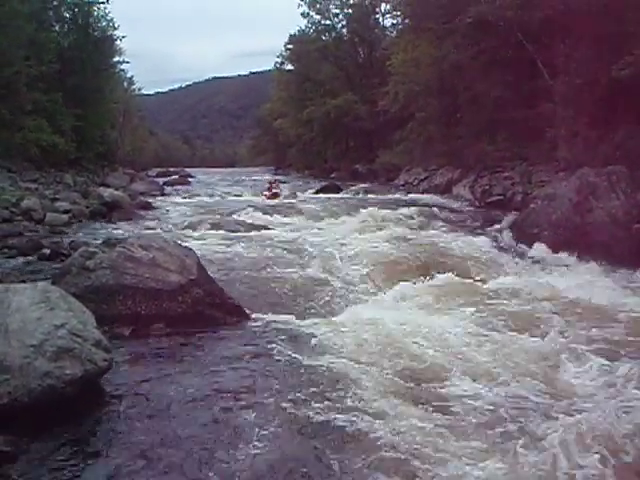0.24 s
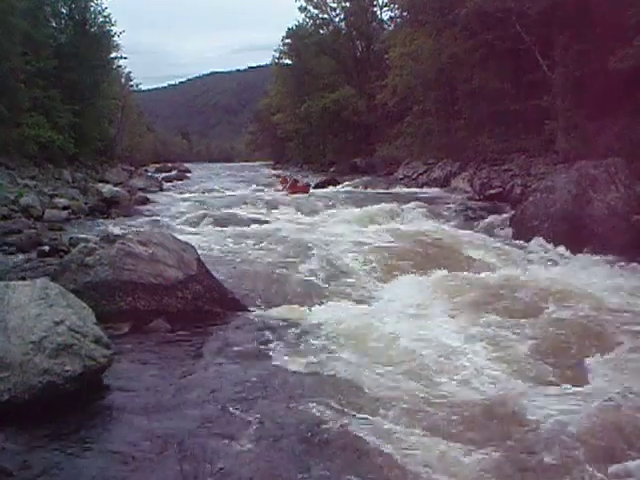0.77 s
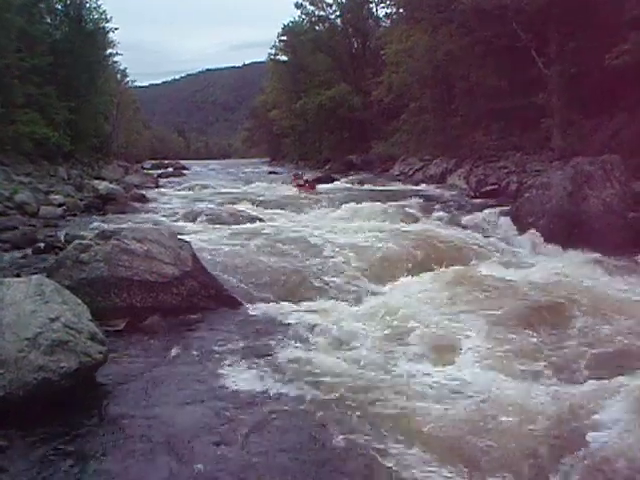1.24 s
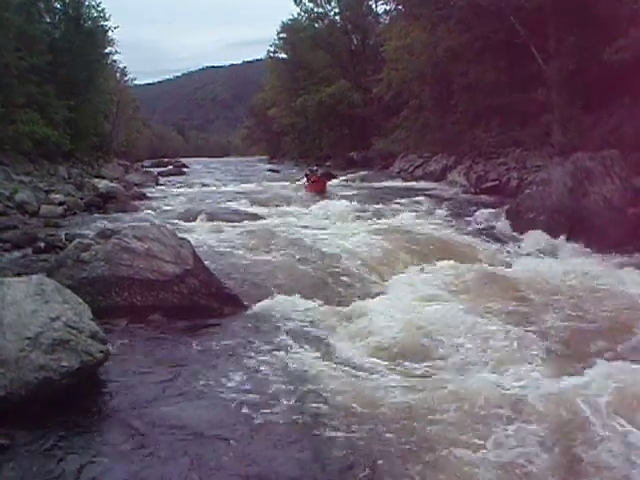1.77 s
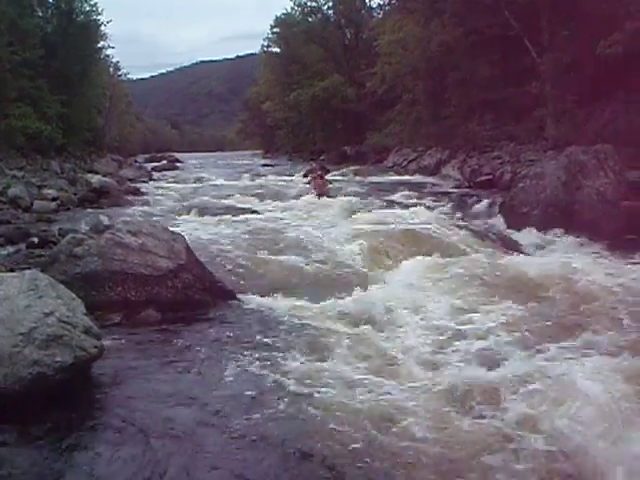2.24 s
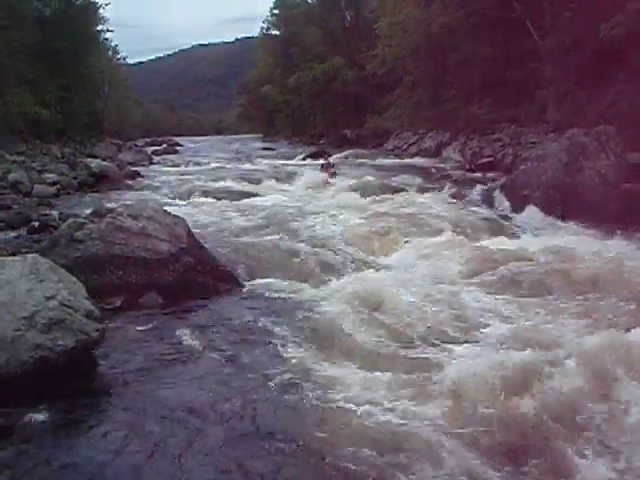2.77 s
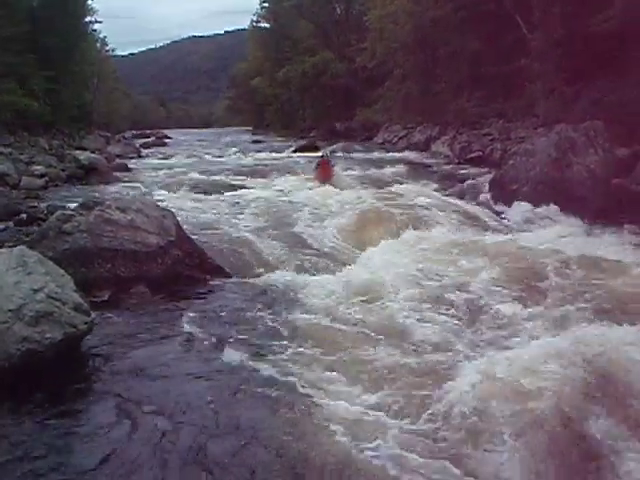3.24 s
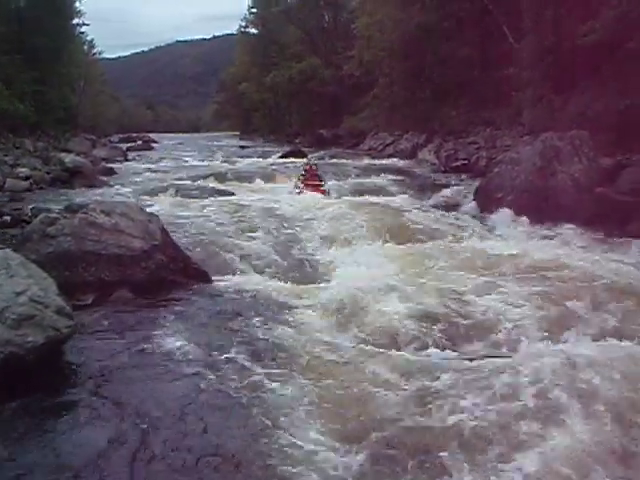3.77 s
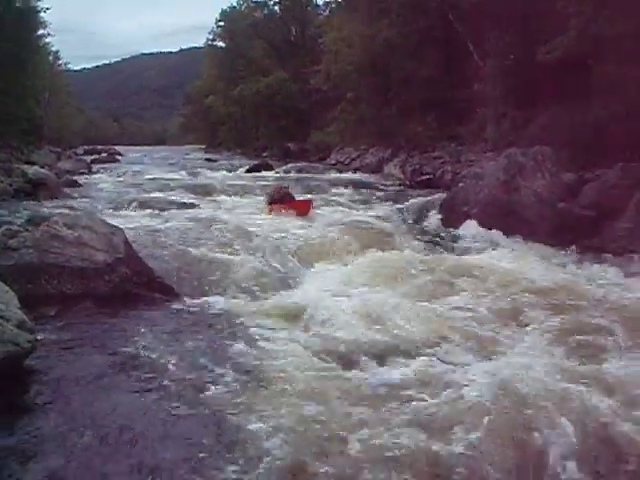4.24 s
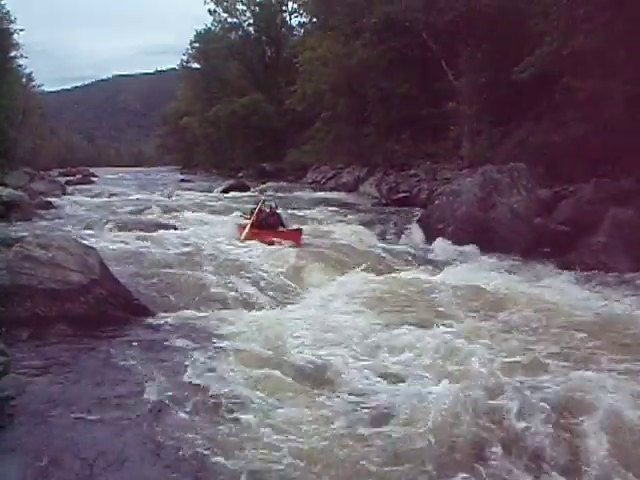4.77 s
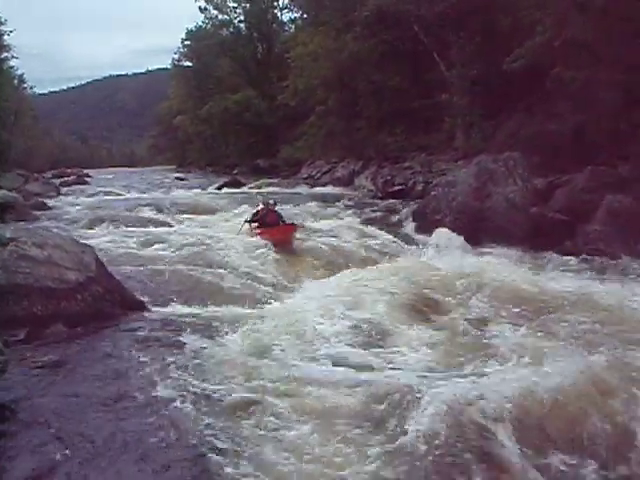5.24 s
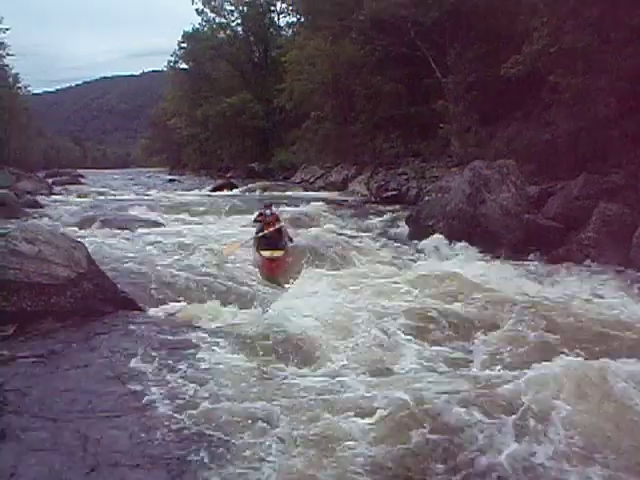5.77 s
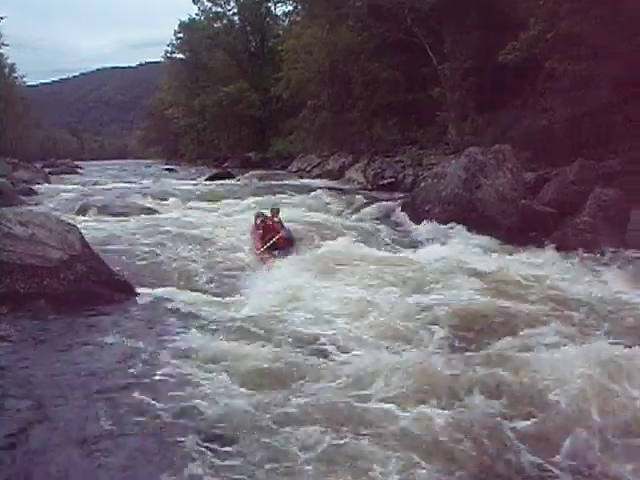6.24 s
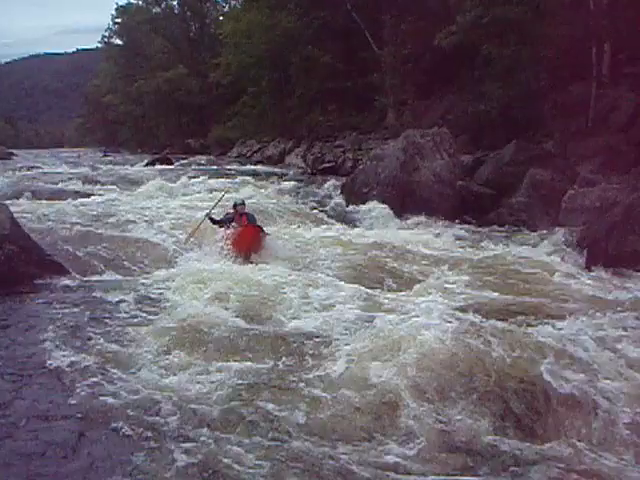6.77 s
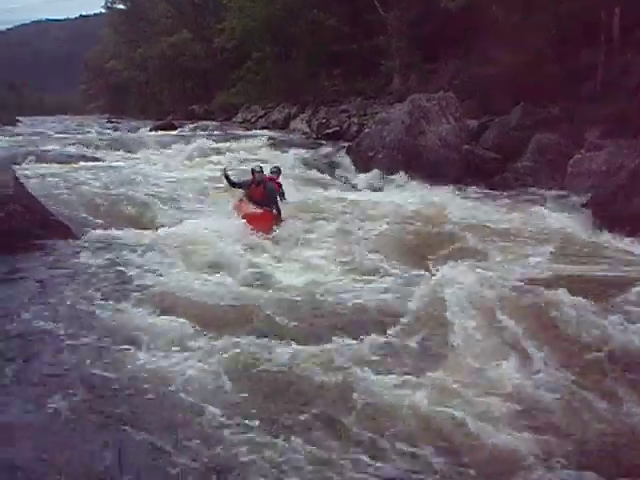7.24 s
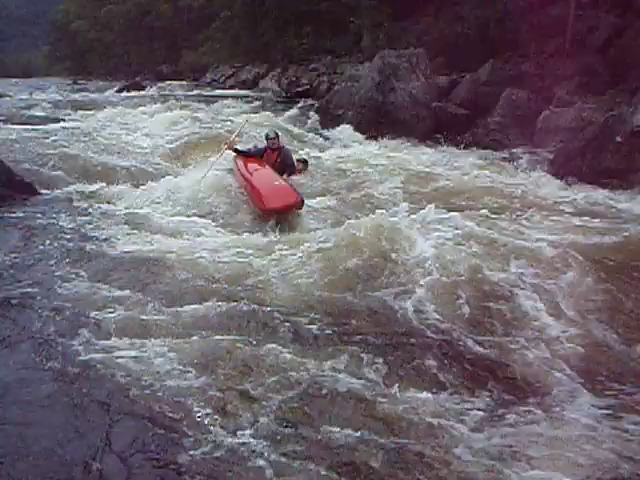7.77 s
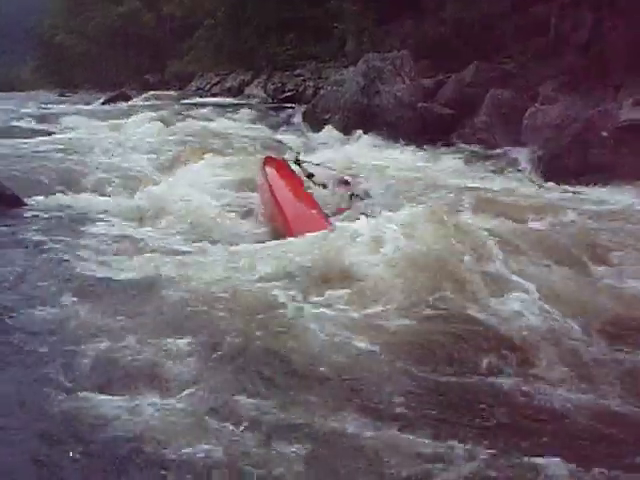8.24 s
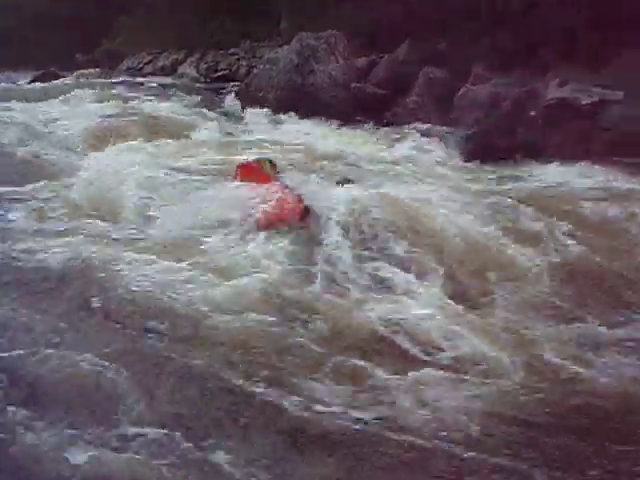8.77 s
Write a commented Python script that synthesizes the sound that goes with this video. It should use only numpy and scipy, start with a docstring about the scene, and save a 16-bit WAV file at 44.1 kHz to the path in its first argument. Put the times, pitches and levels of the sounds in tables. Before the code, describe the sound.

Continuous river rapids outdoors, close to the bank, mono and narrow in band. Broad rushing noise carries dense fizz, watery gurgle and soft pulsing air clouds in the low mids. Big waves briefly boom at different pitches, and the deep rumble strengthens from about six seconds. The loudest peaks are clipped back with faint ticks; the roar never stops.

```python
"""Whitewater over boulders

A river roars over boulders, heard from the bank through a small mono camera microphone.
Shaped noise and swarms of ringing bubbles make the gurgling churn, the hissing spray and the air clouds.
Low noise rumbles where water plunges, and narrow bands of noise boom as big waves fold over.
The camera passes little above 4 kHz; its limiter catches the tallest peaks with faint ticks."""
import sys
import numpy as np
from scipy import signal
from scipy.fft import rfft, irfft, next_fast_len
from scipy.io import wavfile
from scipy.ndimage import map_coordinates

SR = 44100
rng = np.random.default_rng(int(sys.argv[2]) if len(sys.argv) > 2 else 0)


def store_wav(level_fs):
    """Save 16-bit WAV to argv[1]."""
    pcm = np.round(np.clip(np.atleast_2d(level_fs), -1, 1) * 32767)
    wavfile.write(sys.argv[1], SR, pcm.T.astype(np.int16))


N = 396886
CAMERA_RATE_HZ = 8000  # the camera's sample rate; half of it bounds the spray too


def amp(db):
    """Decibels to gain."""
    return 10 ** (np.asarray(db) / 20)


def unit(x):
    """Scale x to rms 1."""
    return x / np.sqrt(np.mean(x ** 2) + 1e-20)


def filtered(x, response):
    """Filter x by a gain that is a function of frequency in Hz, with no phase shift."""
    size = next_fast_len(N + SR // 4)  # padded, so that the end does not wrap onto the start
    spectrum = rfft(x, size) * response(np.fft.rfftfreq(size, 1 / SR))
    return irfft(spectrum, size)[:N]


def coloured(x, points):
    """Equalise x along (f/Hz, level/dB) points joined on a log frequency axis."""
    hz, db = np.transpose(points)
    log_hz = np.log(np.sort(hz))
    return filtered(x, lambda f: amp(np.interp(np.log(f + 1), log_hz, db)))


def wobble(rate):
    """A smooth random curve through normal random knots, rate of them a second."""
    knots = rng.standard_normal(512)
    return map_coordinates(knots, [np.arange(N) * rate / SR], mode="mirror")


def rush(patchy_db, patch_hz, patch_s):
    """White noise of rms 1 in which patches of pitch swell and fade, as single waves break."""
    hz, s, noise = signal.stft(rng.standard_normal(N), SR, nperseg=1024)
    knots = rng.standard_normal((256, 256))
    position = np.meshgrid(hz / patch_hz, s / patch_s, indexing="ij")
    patches = map_coordinates(knots, position, mode="mirror")
    water = signal.istft(noise * amp(patchy_db * patches), nperseg=1024)[1]
    return unit(water[:N])


def bubbles(low_hz, high_hz, cycles, rise, spread_db, count):
    """A swarm of rms 1: each bubble rings for some cycles and climbs in pitch as it nears the surface."""
    when, pitch, size, phase = rng.random((count, 4)).T[:, :, None]
    hz = low_hz + (high_hz - low_hz) * pitch
    k = np.arange(int(cycles * SR / low_hz))
    age = k / SR * hz / cycles  # 1 where the ring has died by 40 dB
    attack = 1 - np.exp(-2 * cycles * age)
    decay = np.exp(-np.log(100) * age)
    nearness_db = -spread_db * np.log(np.maximum(1 - size, np.exp(-5)))  # few are near and strong
    strength = np.sqrt(hz) * amp(nearness_db)
    turns = cycles * age * (1 + rise * age / 2)  # pitch is up by the share "rise" at age 1
    rings = strength * attack * decay * np.sin(2 * np.pi * (turns + phase))
    place = (when * N).astype(int) + k
    return unit(np.bincount(place.ravel(), rings.ravel(), N)[:N])


def surge_db():
    """The force of the breaking crests, in surges and short lulls, one value per sample."""
    # How hard the crests break: t/s, level/dB about the usual level
    surge_points = [(0.0, 0.4), (2.02, 0.2), (2.16, -0.6), (2.46, 0.7), (2.62, -1.6), (3.0, 1.4),
                    (3.22, 0.1), (4.3, 0.4), (4.46, -0.7), (4.96, 0.5), (5.38, -1.1), (6.38, 0.1),
                    (6.48, 1.5), (6.62, 0.1), (8.66, -0.5), (8.76, 0.2), (8.98, -0.1)]
    return np.interp(np.arange(N) / SR, *np.transpose(surge_points))


def facing():
    """How far the camera has turned toward the deepest drop, 0 to 1."""
    start_s, turn_s = 5.2, 0.94
    return np.clip((np.arange(N) / SR - start_s) / turn_s, 0, 1)


def churn():
    """Pea-sized bubbles gurgle in the roar of tumbling water, which follows part of each surge."""
    # Colour of the tumbling water: f/Hz, level/dB
    churn_colour = [(120, -39), (260, -5), (380, 1), (520, 1), (680, -1), (860, -2.5), (1100, -7.5),
                    (1500, -13), (2500, -10.5), (5000, -35)]
    usual_db, surge_share = -16.5, 0.39
    gurgle = bubbles(low_hz=300, high_hz=1600, cycles=16, rise=0.15, spread_db=1.6, count=2000)
    water = rush(patchy_db=0.5, patch_hz=200, patch_s=0.16)
    roar = unit(coloured(water + amp(-17.0) * gurgle, churn_colour))
    return amp(usual_db + surge_share * surge_db()) * roar


def spray():
    """Crests burst into so many tiny bubbles and drops that they hiss, with a slight flutter."""
    # Colour of the breaking crests: f/Hz, level/dB
    spray_colour = [(300, -25.5), (700, -12), (1050, 1.5), (1450, 0.34), (1900, -1.15), (2450, -3),
                    (2900, -1.2), (3350, -0.73), (4000, 4)]
    usual_db, flutter_db = -17.5, 0.35
    fizz = bubbles(low_hz=1040, high_hz=4300, cycles=7, rise=0.15, spread_db=1.8, count=12000)
    water = rush(patchy_db=0.25, patch_hz=800, patch_s=0.14)
    bright = coloured(water + amp(-14.5) * fizz, spray_colour)
    hiss = unit(filtered(bright, lambda hz: hz < CAMERA_RATE_HZ / 2))
    return amp(usual_db + surge_db() + flutter_db * wobble(rate=8.7)) * hiss


def air_clouds():
    """Whole clouds of trapped air pulse like big soft bubbles, a little quieter after the turn."""
    # Colour of the air clouds: f/Hz, level/dB
    cloud_colour = [(50, -51), (100, -3), (150, 0), (200, 2.5), (300, 0), (400, -8), (600, -3.5),
                    (1200, -23)]
    before_turn_db, turn_loss_db = -19, 0.5
    gulps = bubbles(low_hz=123.1, high_hz=474.5, cycles=17.3, rise=0.073, spread_db=1, count=2400)
    water = rush(patchy_db=1.5, patch_hz=92, patch_s=0.33)
    clouds = unit(coloured(water + amp(-3.5) * gulps, cloud_colour))
    return amp(before_turn_db - turn_loss_db * facing()) * clouds


def plunge():
    """Heavy water drops behind the boulders with a lumpy rumble, louder once the camera faces it."""
    # Colour of the plunging water: f/Hz, level/dB
    plunge_colour = [(10, -21.5), (25, -22.5), (40, -11.5), (62, -2.5), (100, 2), (130, 1), (190, -4.5),
                     (400, -65)]
    before_turn_db, turn_gain_db, lumps_db = -24, 2.5, 0.96
    rumble = unit(coloured(rng.standard_normal(N), plunge_colour))
    return amp(before_turn_db + turn_gain_db * facing() + lumps_db * wobble(rate=9)) * rumble


def boils():
    """Each big wave folds over a pocket of air that booms in a narrow band, swelling and fading."""
    # Booms: t/s at the height, time/s from there to 17 dB down, f/Hz at the centre, level/dB at the height
    boom_list = [(0.703, 0.12, 289, -16.5), (1.643, 0.43, 912, -25), (2.562, 0.26, 233, -18.5),
                 (3.11, 0.25, 80.3, -27), (3.209, .72, 560, -28), (3.9, 0.87, 239, -23),
                 (5.1, .4, 344, -20), (6.355, 0.37, 393, -20.5), (6.98, 0.29, 102, -24),
                 (8.484, 0.32, 166.5, -25), (8.558, 0.16, 73.2, -23.5)]
    width = 0.2  # standard spread of a boom, as a share of its pitch
    t, out = np.arange(N) / SR, np.zeros(N)
    for height_s, fade_s, hz, db in boom_list:
        noise = rng.standard_normal(N)
        boom = unit(filtered(noise, lambda f: np.exp(-0.5 * ((f / hz - 1) / width) ** 2)))
        swell = np.exp(-2 * ((t - height_s) / fade_s) ** 2)
        out += amp(db) * swell * boom
    return out


def scene():
    """All parts of the rapid reach the one microphone together."""
    return (plunge() + air_clouds() + boils() + churn() + spray())[None]


def record(dry):
    """Slow sampling mirrors the top of the narrow band; a limiter grabs tall peaks and lets go quickly."""
    # Band of the camera: f/Hz, level/dB
    camera_band = [(3500, 0), (3700, -4.5), (3850, -7), (4000, -13.5), (4200, -17), (4350, -26),
                   (4500, -35.5), (4750, -64.5), (5200, -120)]
    ceiling, release_db_per_s, top_hz = 0.71, 200, 15900
    t = np.arange(N) / SR
    band = filtered(dry[0], lambda hz: hz < CAMERA_RATE_HZ / 2)
    mirrored = band * (1 + 2 * np.cos(2 * np.pi * CAMERA_RATE_HZ * t))  # adds images about the sample rate
    sampled = coloured(mirrored, camera_band)

    # the cut jumps to each peak's excess at once, then falls at the release rate
    over_db = 20 * np.log10(np.maximum(np.abs(sampled) / ceiling, 1))
    recovery_db = release_db_per_s * t
    cut_db = np.maximum.accumulate(over_db + recovery_db) - recovery_db
    return filtered(sampled * amp(-cut_db), lambda hz: hz < top_hz)[None]


dry = scene()
out = record(dry)
store_wav(out)
```